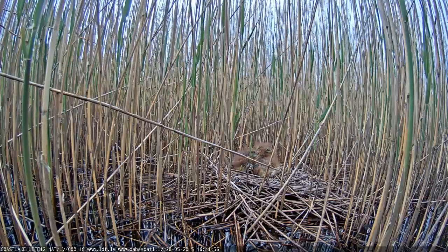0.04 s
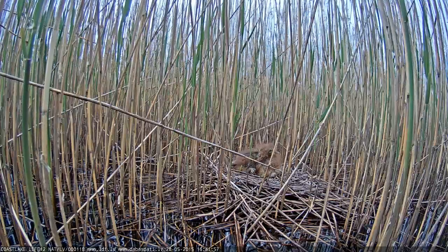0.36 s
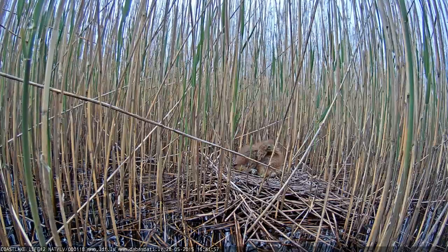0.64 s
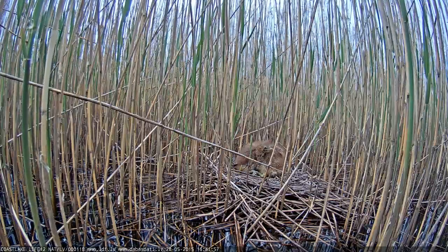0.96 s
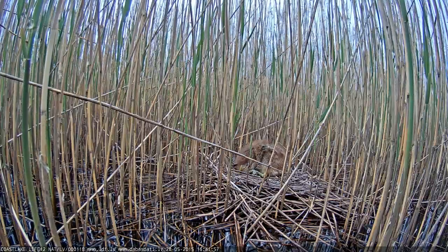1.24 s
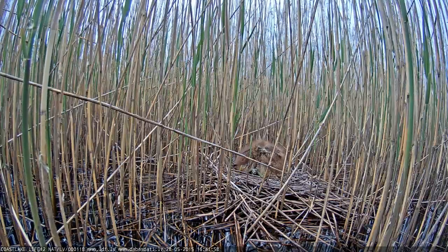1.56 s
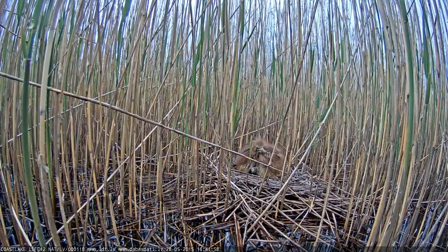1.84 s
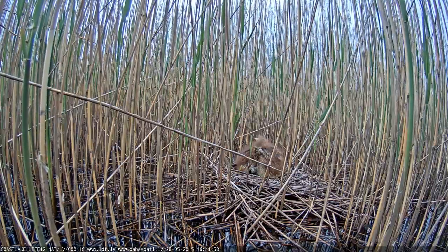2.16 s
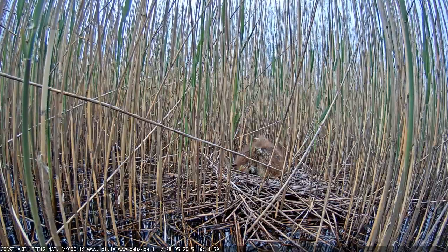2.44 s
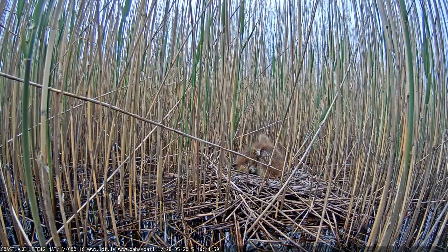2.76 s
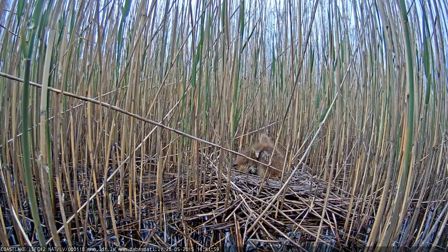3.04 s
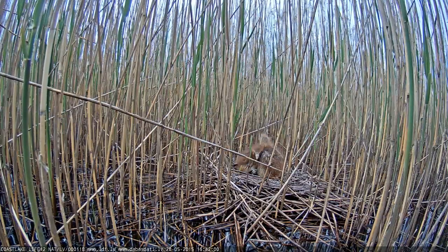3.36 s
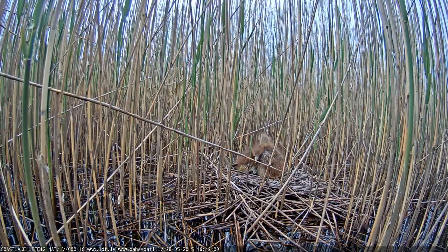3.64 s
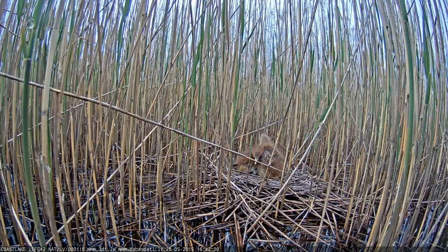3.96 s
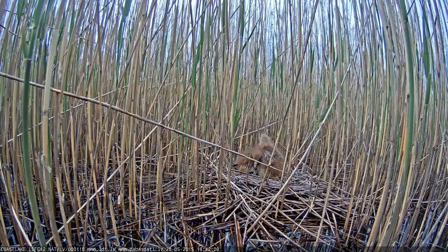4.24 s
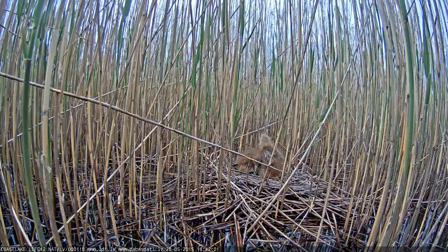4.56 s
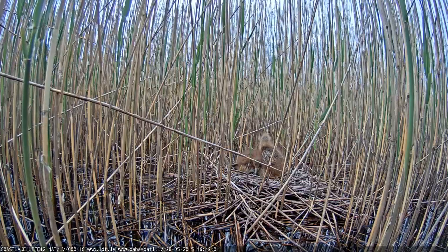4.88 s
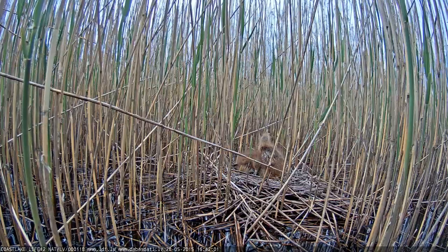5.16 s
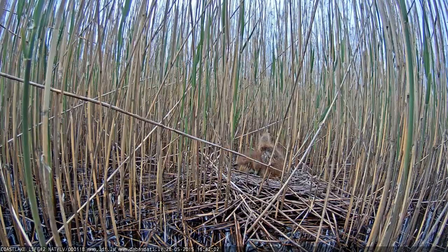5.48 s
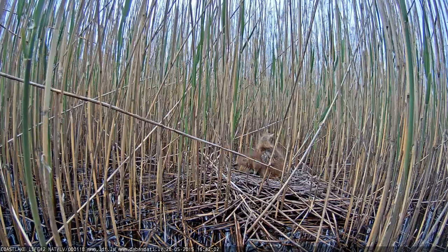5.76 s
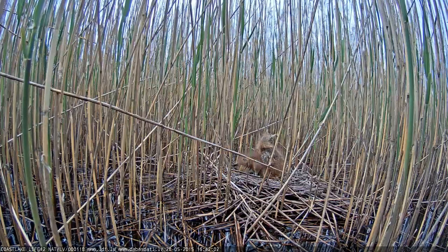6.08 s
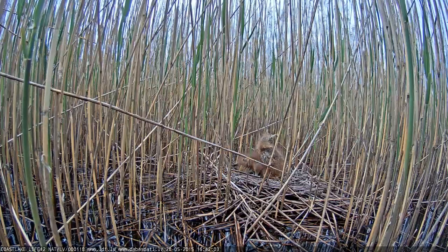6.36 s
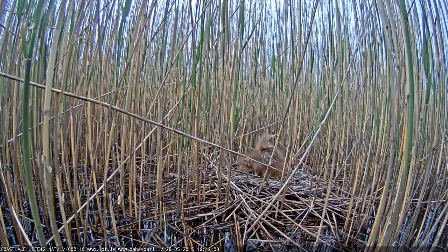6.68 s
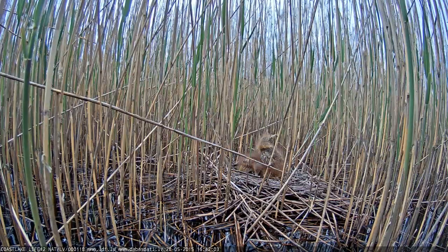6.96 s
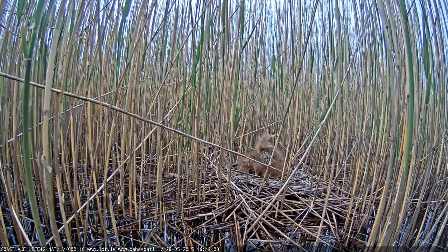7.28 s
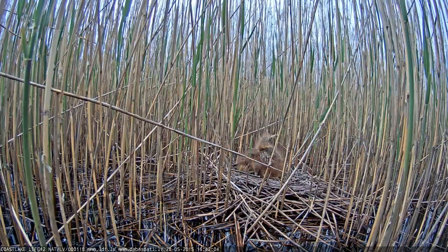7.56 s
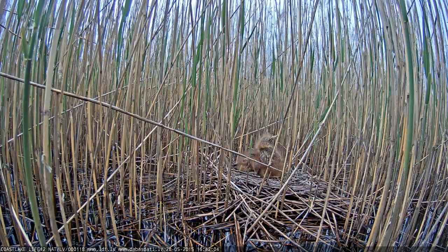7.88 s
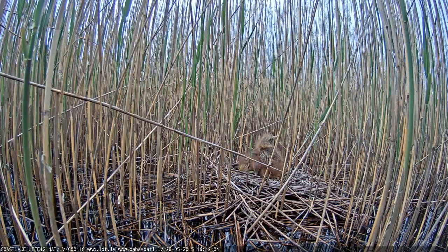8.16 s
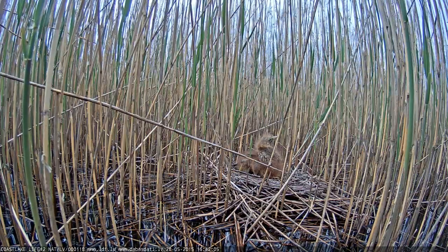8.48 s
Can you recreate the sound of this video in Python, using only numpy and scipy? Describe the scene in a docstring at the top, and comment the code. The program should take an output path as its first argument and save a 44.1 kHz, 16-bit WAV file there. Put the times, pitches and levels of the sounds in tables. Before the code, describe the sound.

Short, raspy bursts of warbler song sound among reeds, over faraway birds, faint hiss and a low outdoor rumble.

```python
"""A warbler sings close to the microphone in a dense reedbed: two swelling trills, then a harsh chatter
figure, repeated, from vibrating membranes shaped by throat and beak. Rough buzzes come loud and close or
faint and higher from farther off. Neighbours slur, whistle, churr and stutter over a chorus of far birds,
and a dry stem ticks now and then. The stems scatter every call into a short wet tail. The microphone,
on a fixed camera, adds its hiss to a low outdoor rumble."""
import sys
import numpy as np
from scipy import signal
from scipy.fft import rfft, irfft, next_fast_len
from scipy.io import wavfile

SR = 44100
rng = np.random.default_rng(int(sys.argv[2]) if len(sys.argv) > 2 else 0)


def transcribe(signal):
    """Save signal, clipped to [-1, 1], as a 16-bit WAV file at the path in sys.argv[1]."""
    frames = np.atleast_2d(signal).T
    limited = np.clip(frames, -1, 1)
    pcm = np.round(limited * 32767).astype(np.int16)
    wavfile.write(sys.argv[1], SR, pcm)


N = 384552
T = np.arange(N) / SR

# Levels are relative: gains, resonances and the reeds still act on the way to the microphone.
# spectra of the outdoor rumble and the microphone hiss: f/Hz, level/dB
RUMBLE_SPECTRUM = [(15, -13), (37, 2), (55, -5.5), (76, -5), (100, -10), (160, -16.5), (230, -20),
                   (400, -26.5), (800, -29.5), (3000, -37.5)]
HISS_SPECTRUM = [(100, -10.5), (600, 3), (1200, 11), (3000, 7), (6000, -2), (12000, -5)]
# spectra of the low and high voices far across the reedbed: f/Hz, level/dB
LOW_VOICE_SPECTRUM = [(800, -30), (1400, -11), (1800, -4.5), (2200, 3), (2600, 6.5), (3000, -3),
                      (3500, -52), (5000, -34)]
HIGH_VOICE_SPECTRUM = [(2000, -51), (2800, 4), (3200, 3), (3600, 0), (4050, -5.5), (4400, -12),
                       (5200, -24.5), (7000, -33)]
# swell of the far chorus: t/s, low voices' level/dB, high voices' level/dB
CHORUS_LEVELS = [(0.04, -49.5, -57), (0.26, -55, -57.5), (0.74, -49.5, -58.5), (1.2, -54, -56.5),
                 (1.48, -55.5, -55), (2.08, -54.5, -52.5), (2.8, -54, -52.5), (3.4, -56.5, -55),
                 (4.36, -59.5, -53.3), (4.84, -57.5, -56.5), (5.16, -61.8, -57.5), (5.74, -56.5, -58.5),
                 (6.14, -55, -55.5), (6.57, -55.5, -60.5), (6.95, -51.1, -59), (7.42, -54.5, -52.5),
                 (8.3, -54.5, -51.5), (8.6, -51.5, -52)]
# long waves slip past the thin stems, short ones bounce: f/Hz, level/dB
SCATTER_SPECTRUM = [(1300, -7), (1900, -4), (2500, 0), (3500, 3), (4100, -2)]
# resonance of a warbler's throat, and the treble a wide-open beak adds: f/Hz, level/dB
THROAT_SPECTRUM = [(700, -29.5), (1250, -20.5), (1600, -16), (1900, -10.5), (2200, -8), (2450, 3),
                   (2650, 3), (2850, -2), (3150, -16.5), (3600, -46), (5200, -51)]
OPEN_BEAK_SPECTRUM = [(2600, -18), (3100, -2), (3700, 4), (4100, -2), (4500, -16.5), (5500, -26),
                      (7000, -54)]

# rough buzzes, some loud and close, others faint and higher from farther off:
# t/s, length/s, level/dB, beak resonance/Hz
BUZZ_NOTES = [(0, 0.057, -61, 3030), (4.141, 0.2, -51.5, 3094), (4.423, .175, -51, 3084),
              (4.719, 0.18, -51.5, 3030), (6.756, .11, -39, 2539), (7.11, .11, -38.5, 2530),
              (7.288, .034, -45, 3060), (7.473, 0.16, -48, 2823), (8.149, 0.073, -47, 2590),
              (8.647, 0.024, -46, 2560)]
# thin slurs further off: t/s, length/s, start f/Hz, end f/Hz, level/dB
SLUR_NOTES = [(0, .05, 3270, 3250, -51), (.68, .04, 3300, 3620, -54), (1.025, .056, 3080, 3950, -55),
              (1.322, .058, 3020, 3750, -53), (1.536, .05, 3120, 3900, -51),
              (1.74, .045, 3100, 3700, -52.5), (1.828, .028, 3850, 3250, -50.5),
              (1.97, .13, 3100, 3900, -51), (2.2, .1, 3200, 3700, -54), (3.61, .08, 3950, 3400, -53.5),
              (3.775, .055, 2900, 4600, -55), (4.08, .035, 3130, 3080, -50), (5.33, .1, 3500, 3580, -57.5),
              (6.735, .05, 3780, 4100, -50), (7.033, .055, 3730, 4080, -53), (8.672, .025, 2680, 2380, -44)]
# neighbours' whistles, mostly in pairs: t/s, length/s, f/Hz, level/dB of harmonics 1, 2, 3
WHISTLE_NOTES = [(0.124, 0.052, 1464, -57, -52, -63), (1.186, 0.092, 1680, -58.5, -63, -90),
                 (1.388, .083, 1678, -55.5, -56.5, -81), (2.459, 0.078, 1336, -59.5, -49.5, -58),
                 (2.66, 0.061, 1358, -57.5, -46, -53.5), (5.03, 0.086, 1337, -66, -56.5, -51.5),
                 (5.212, 0.086, 1312, -69, -60, -49.5), (7.379, 0.069, 1384, -58.5, -48, -62),
                 (7.741, 0.064, 1330, -68, -58, -48.5), (8.123, 0.087, 1335, -79, -47, -60)]
# dry stems cracking: t/s, level/dB
STEM_TICKS = [(0.329, -59), (7.955, -51), (8.326, -62)]
# spectrum of a crack: f/Hz, level/dB
TICK_SPECTRUM = [(600, -22), (1500, -3), (3500, 3), (7000, 6), (10000, -20)]
# the near bird's trills: t/s, beats, last whistle's level/dB
TRILL_PHRASES = [(.401, 7, -29), (.801, 6, -29)]
# its chatter: t/s, figure, chips sung, time stretch, level/dB, crescendo/dB, open-beak treble/dB
CHATTER_PHRASES = [(1.626, "rattle", 7, 0.97, -31.5, 0, -23), (1.878, "rattle", 7, 1, -31, 1, -32),
                   (2.147, "rattle", 7, 0.96, -29.5, -2, -21), (2.895, "rattle", 5, .85, -41.5, 15, -23),
                   (3.043, "rattle", 7, .85, -37.5, 5, -21), (6.648, "clicks", 4, 1, -33, -2, -22),
                   (6.999, "clicks", 4, 0.99, -31.5, -0.5, -20)]
# its two chatter figures, chip by chip: t/s into the figure, level/dB, length/s
CHATTER_FIGURES = {"rattle": [(0, -2, 0.0116), (.0165, .5, 0.0128), (.045, -1, 0.01185), (.072, -1, 0.0131),
                   (.107, -5, .012), (.12, -2, 0.0144), (.136, -1, 0.01294)], "clicks": [(0, -2.5, .011),
                   (.014, -4.5, 0.0106), (.039, -6, .011), (.071, -1, 0.0101)]}
# a second bird's churrs: t/s, beats, last beat's level/dB
CHURR_PHRASES = [(3.548, 1, -39.5), (3.593, 4, -37), (3.848, 2, -37), (5.447, 3, -33.5), (5.601, 3, -33),
                 (5.801, 4, -32.5), (5.98, 3, -32), (6.219, 4, -34), (6.375, 4, -34.5)]
# a neighbour's stuttered calls: t/s, level/dB
STUTTER_CALLS = [(7.599, -52), (7.814, -51.5), (8.048, -51), (8.294, -51.5)]


def amp(db):
    """Decibels to gain."""
    return 10 ** (np.asarray(db) / 20)


def level(x, db):
    """Scale a sound to an rms level."""
    return x * amp(db) / np.sqrt(np.mean(x ** 2) + 1e-20)


def gain_at(hz, spectrum):
    """Gain of a (f/Hz, level/dB) spectrum at the given frequencies."""
    f, db = np.transpose(spectrum)
    return amp(np.interp(np.log(hz + 1), np.log(f), db))


def colour(x, spectrum):
    """Filter a sound by a (f/Hz, level/dB) spectrum."""
    size = next_fast_len(len(x))
    hz = np.arange(size // 2 + 1) * SR / size
    return irfft(rfft(x, size) * gain_at(hz, spectrum), size)[:len(x)]


def wander(rate_hz):
    """Smooth random drift with a spread near 1."""
    return np.interp(T * rate_hz, np.arange(N), rng.standard_normal(N))


def between(ends, share):
    """The value a share of the way from one end to the other."""
    return ends[0] + (ends[1] - ends[0]) * share


def add(out, start, x):
    """Mix a sound in at a time in seconds."""
    i = int(np.clip(start * SR, 0, N - 1))
    out[i:i + len(x)] += x[:N - i]


def span(start, length):
    """Sample indices i of a note and its progress u from 0 to 1."""
    u = np.linspace(0, 1, max(int(length * SR), 64))
    return (int(start * SR) + np.arange(len(u))) % N, u


def swell(u, edge):
    """Note envelope with rounded ends, each a share `edge` of the note."""
    return np.sin(np.pi / 2 * np.clip(np.minimum(u, 1 - u) / edge, 0, 1)) ** 2


def phase(hz):
    """Phase of a moving pitch."""
    return 2 * np.pi * np.cumsum(hz) / SR


def rumble_and_hiss(rumble_db=-55, hiss_db=-66):
    """Low outdoor rumble under the microphone's even hiss."""
    rumble = level(colour(rng.standard_normal(N), RUMBLE_SPECTRUM), rumble_db)
    hiss = level(colour(rng.standard_normal(N), HISS_SPECTRUM), hiss_db)
    return rumble + hiss


def reeds(x, stems_db, stems_t60, tail_db, tail_t60):
    """Close stems scatter a call at once; the wider bed returns a tail. Decay times are in seconds."""
    t = T[:SR]
    build_up = 1 - np.exp(-t / .015)
    echo = np.zeros(SR)
    for db, t60 in (stems_db, stems_t60), (tail_db, tail_t60):
        scatter = rng.standard_normal(SR) * np.exp(-np.log(1000) * t / t60) * build_up
        echo += amp(db) * scatter / np.linalg.norm(scatter)
    wet = colour(signal.fftconvolve(x, echo)[:N], SCATTER_SPECTRUM)
    return (x + wet) / np.sqrt(1 + np.sum(echo ** 2))


def far_voices(spectrum, glide=.1985, spread_db=3, throb_db=3, chirp_db=-4, count=900):
    """Far chirps, blurred by the reeds, in a throbbing wash of rasps too distant to tell apart."""
    chirps = np.zeros(N)
    for when_pitch_length, (slope, size) in zip(rng.random((count, 3)), rng.standard_normal((count, 2))):
        when, pitch, length = when_pitch_length
        _, u = span(0, between((.01025, .0442), length))
        hz = between((1900, 4400), pitch) * np.exp(glide * slope * (u - .5))
        add(chirps, when * T[-1], amp(spread_db * size) * np.sin(phase(hz)) * swell(u, .21))
    blurred = reeds(colour(chirps, spectrum), stems_db=-4, stems_t60=.24, tail_db=1, tail_t60=.2)
    wash = colour(rng.standard_normal(N), spectrum) * amp(throb_db * wander(130))
    return level(level(blurred, chirp_db) + level(wash, 0), 0)


def chorus():
    """Far across the bed, low and high voices wax and wane on their own."""
    times, low_db, high_db = np.transpose(CHORUS_LEVELS)
    low = far_voices(LOW_VOICE_SPECTRUM) * amp(np.interp(T, times, low_db))
    high = far_voices(HIGH_VOICE_SPECTRUM) * amp(np.interp(T, times, high_db))
    return low + high


def syrinx(hz, beak_hz=2600, treble_db=-60, harmonics=9):
    """Harmonics of the vibrating membranes, each weighted by throat and beak as it glides through."""
    k = np.arange(1, harmonics + 1)[:, None]
    partial_hz = np.abs(k * hz)
    throat = gain_at(partial_hz * 2600 / beak_hz, THROAT_SPECTRUM)
    open_beak = amp(treble_db) * gain_at(partial_hz, OPEN_BEAK_SPECTRUM)
    return np.sum((throat + open_beak) * np.sin(k * phase(hz)), axis=0)


def buzzes(pitch_to_beak=.254, beat_hz=145, rough=.095, depth=.48):
    """Rough held creaks, close or farther off, chopped by the beating of a second membrane."""
    out, shake = np.zeros(N), 1 + rough * wander(900)
    beat_rate = beat_hz * (1 + .1394 * wander(120))
    chop = 1 + depth * np.sin(phase(beat_rate))
    for start, length, db, beak_hz in BUZZ_NOTES:
        i, u = span(start, length)
        creak = syrinx(pitch_to_beak * beak_hz * shake[i], beak_hz)
        add(out, start, level(creak * chop[i] * swell(u, .12), db))
    return out


def slurs(notes, waver=.022):
    """Thin gliding notes with a slight rasp, some way off in the reeds."""
    out, shake = np.zeros(N), 1 + waver * wander(500)
    for start, length, start_hz, end_hz, db in notes:
        i, u = span(start, length)
        hz = between((start_hz, end_hz), u) * shake[i]
        add(out, start, level(np.sin(phase(hz)) * swell(u, .3), db))
    return out


def piped(notes, edge, scoop=.025, waver=.0093, beak_hz=2900, beak_width_hz=170, beak_gain=3):
    """Clear notes that scoop up and droop; a harmonic flares as it falls through the beak resonance."""
    out, shake = np.zeros(N), 1 + waver * wander(250)
    for start, length, hz, droop, harmonics_db in notes:
        i, u = span(start, length)
        pitch = hz * (1 - scoop * np.exp(-u / .13) - droop * u ** 4) * shake[i]
        for k, db in enumerate(harmonics_db, 1):
            flare = 1 + beak_gain / (1 + ((k * pitch - beak_hz) / beak_width_hz) ** 2)
            add(out, start, level(np.sin(k * phase(pitch)) * flare * swell(u, edge), db))
    return out


def whistles(droop=.023):
    """Neighbours pipe soft-edged nasal notes of three harmonics, almost level in pitch."""
    notes = [(start, length, hz, droop, levels) for start, length, hz, *levels in WHISTLE_NOTES]
    return piped(notes, edge=.13)


def ticks(length_s=.0029):
    """A dry stem cracks faintly now and then."""
    out = np.zeros(N)
    for start, db in STEM_TICKS:
        _, u = span(start, length_s)
        add(out, start, level(rng.standard_normal(len(u)) * np.exp(-4 * u), db))
    return colour(out, TICK_SPECTRUM)


def trills(beat_s=.0338, flip_s=.0097, creak_fall=.21, arch=.18, fade_db=3, rough=.005):
    """The near voice flips from a falling creak to a whistle about an octave up, harder every beat."""
    # each pair runs from the weakest beat to the strongest
    creak_hz, creak_db, whistle_s = (530, 640.4), (-11.5, -3.5), (.0082, .0303)
    whistle_hz, last_sag_hz, rise_db = 1408, 111, 27
    out, shake = np.zeros(N), 1 + rough * wander(670)
    for first, beats, db in TRILL_PHRASES:
        for beat in range(beats):
            start = first + beat * beat_s
            effort = 1 - (beats - 1 - beat) / 6
            i, u = span(start, length=.012)
            creak = syrinx(between(creak_hz, effort) * (1 + creak_fall * (.5 - u)) * shake[i])
            add(out, start, level(creak * swell(u, .36), db + between(creak_db, effort)))
            # the whistle rises and falls in one arch and weakens as it drops away
            _, u = span(start, between(whistle_s, effort))
            peak_hz = whistle_hz - last_sag_hz * effort ** 9
            whistle = syrinx(peak_hz * (1 - arch * (2 * u - 1) ** 2), harmonics=3)
            whistle *= swell(u, .16) * amp(-fade_db * u ** 2)
            add(out, start + flip_s, level(whistle, db - rise_db * (1 - effort) ** 1.5))
    return colour(out, [(1100, -7), (1500, 0)])  # thin the bass


def chips(notes, pitch_hz, fall, rough, beak_hz, beak_db, gain_db):
    """Each chip plunges in pitch, so one harmonic after another flashes through the beak resonance."""
    out, shake = np.zeros(N), 1 + rough * wander(900)
    for (start, db, treble_db, length), detune in zip(notes, rng.standard_normal(len(notes))):
        i, u = span(start, length)
        hz = pitch_hz * (1 + .0509 * detune) * np.exp(fall * (.5 - u)) * shake[i]
        chip = syrinx(hz, beak_hz, treble_db + beak_db) * swell(u, .15)
        add(out, start, level(chip, db + gain_db))
    return out


def throat_ring(x, hz, width_hz, gain):
    """The throat rings on briefly at its resonance, rounding and linking the chips."""
    return x + gain * signal.lfilter(*signal.iirpeak(hz, hz / width_hz, fs=SR), x)


def chatter(beak_closing_db=3):
    """The near bird repeats figures of steep chips, losing treble as its beak closes over each phrase."""
    notes = []
    for start, figure, count, stretch, db, crescendo_db, treble_db in CHATTER_PHRASES:
        for (after, chip_db, length), along in zip(CHATTER_FIGURES[figure], np.linspace(0, 1, count)):
            notes.append((start + stretch * after, db + chip_db + crescendo_db * along,
                          treble_db - beak_closing_db * along, length))
    voice = chips(notes, pitch_hz=756, fall=.44, rough=.055, beak_hz=2608, beak_db=.5, gain_db=-4.5)
    return throat_ring(voice, hz=2630, width_hz=350, gain=.081)


def twitter(count=28, during_s=(2.9, 4.95), length_s=(.025, .065), sweep_hz=(2950, 4560), db=-60):
    """A far bird strings steep sweeps together at a loose pace, more of them up than down."""
    notes = []
    for k, (late, long, direction) in enumerate(rng.random((count, 3))):
        ends_hz = sweep_hz if direction < .7 else sweep_hz[::-1]
        notes.append((between(during_s, (k + late) / count), between(length_s, long), *ends_hz, db))
    return slurs(notes)


def churrs(beat_s=.0243, length_s=.01417, rise_db=2, treble_db=-11.5, flick_s=.0115, flick_db=-12):
    """A second bird's rougher, brighter beats grow evenly to a soft flick; its narrow throat rings."""
    notes = []
    for start, beats, db in CHURR_PHRASES:
        last = beats - 1
        for k in range(beats):
            notes.append((start + k * beat_s, db - rise_db * (last - k), treble_db, length_s))
        notes.append((start + last * beat_s + flick_s, db + flick_db, treble_db, length_s))
    voice = chips(notes, pitch_hz=561, fall=.411, rough=.069, beak_hz=2580, beak_db=3.5, gain_db=-9.5)
    return throat_ring(voice, hz=2470, width_hz=230, gain=.79)


def pips(count=5, during_s=(6.1, 6.217), length_s=.012, fall_hz=(1920, 1430), db=(-56.5, -53.5)):
    """A neighbour's short run of low falling pips grows louder."""
    return slurs([(between(during_s, along), length_s, *fall_hz, between(db, along))
                  for along in np.linspace(0, 1, count)])


def stutters(count=4, beat_s=.0362, hz=1778):
    """A neighbour's quick notes on one pitch grow longer; the last plunges and its octave flashes."""
    length_s, droop, octave_db = (.0206, .044), (.072, .227), (-2, 9.5)  # first note, last note
    notes = []
    for start, db in STUTTER_CALLS:
        for k, along in enumerate(np.linspace(0, 1, count)):
            plunge = along ** 5
            levels = (db, db + between(octave_db, plunge))
            notes.append((start + k * beat_s, between(length_s, along), hz, between(droop, plunge), levels))
    return piped(notes, edge=.11)


def scene():
    """One microphone in the reeds: trills and buzzes driest, neighbours wetter, the chorus far behind."""
    trill_and_buzz = reeds(trills() + buzzes(), stems_db=-11.5, stems_t60=.07, tail_db=-9, tail_t60=.48)
    near_chatter = reeds(chatter(), stems_db=-7.5, stems_t60=.06, tail_db=-8.5, tail_t60=.48)
    second_bird = reeds(churrs(), stems_db=-2.5, stems_t60=.051, tail_db=-3, tail_t60=.52)
    piping = whistles() + stutters() + slurs(SLUR_NOTES) + twitter() + pips()
    neighbours = reeds(piping, stems_db=-6.5, stems_t60=.09, tail_db=-4.5, tail_t60=.55)
    small_beak = signal.butter(4, 900, "highpass", fs=SR, output="sos")  # radiates no bass
    birds = signal.sosfilt(small_beak, trill_and_buzz + near_chatter + second_bird + neighbours)
    return (birds + chorus() + ticks() + rumble_and_hiss())[None]


def record(dry):
    """The camera cuts the top from the microphone's signal and adds a small steady offset."""
    top_hz, offset = 12050, .0087
    top_cut = signal.ellip(12, .1, 70, top_hz, fs=SR, output="sos")
    return signal.sosfilt(top_cut, dry) + offset


dry = scene()
out = record(dry)
transcribe(out)
```